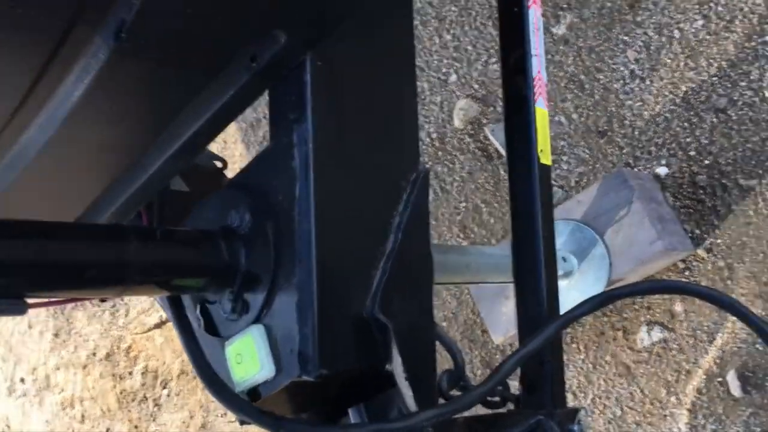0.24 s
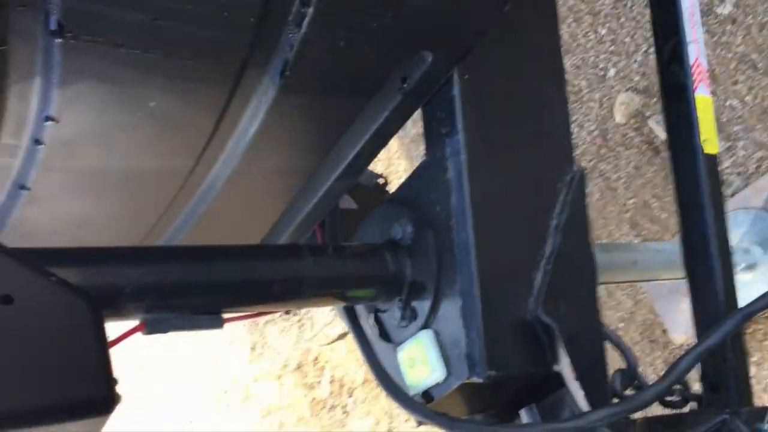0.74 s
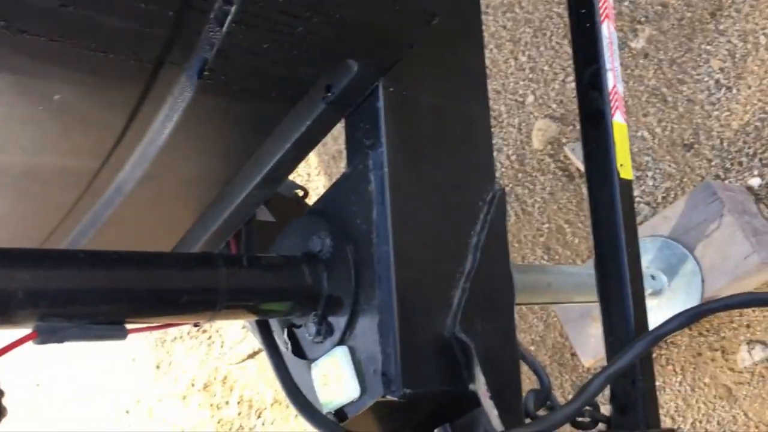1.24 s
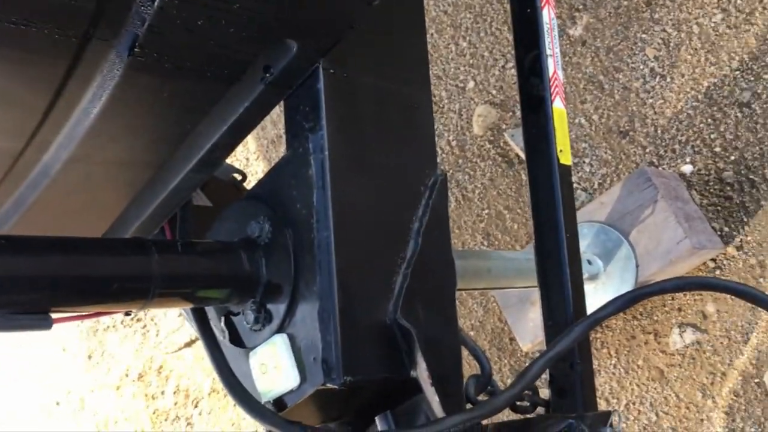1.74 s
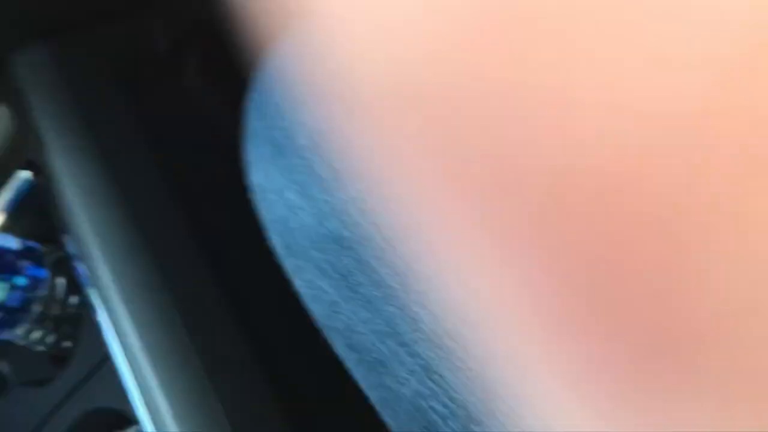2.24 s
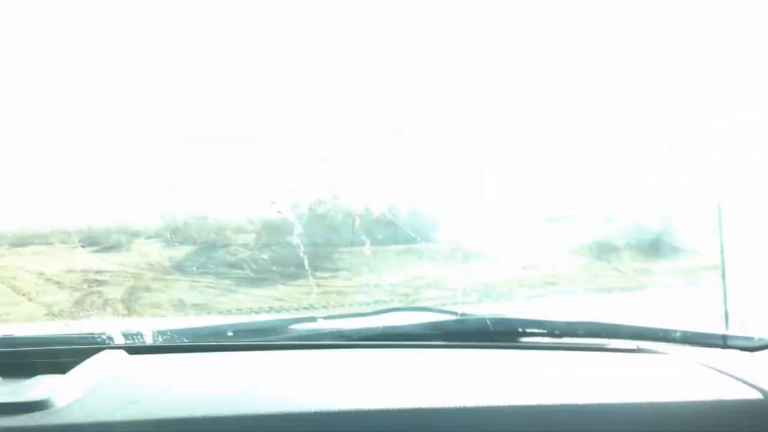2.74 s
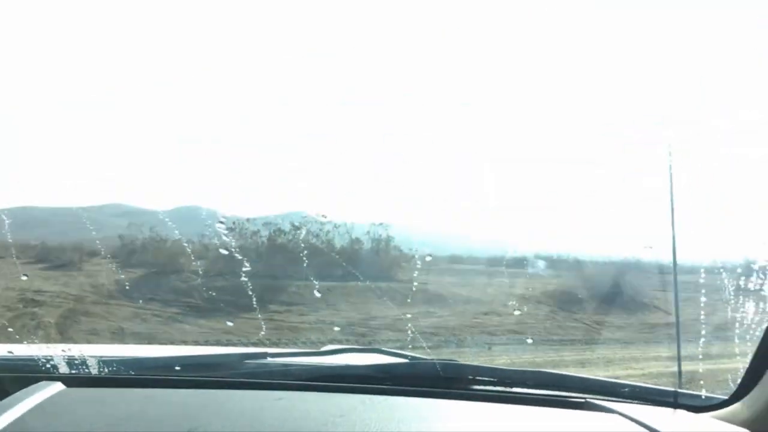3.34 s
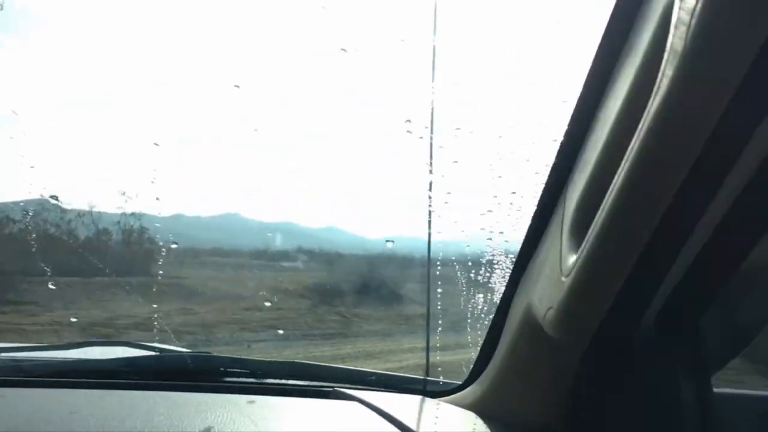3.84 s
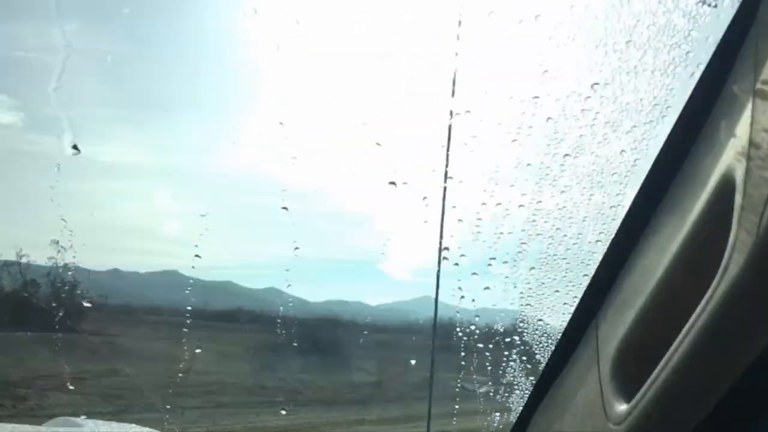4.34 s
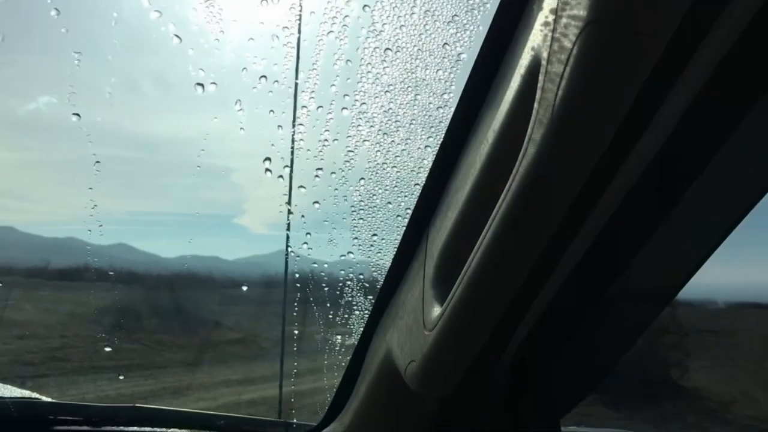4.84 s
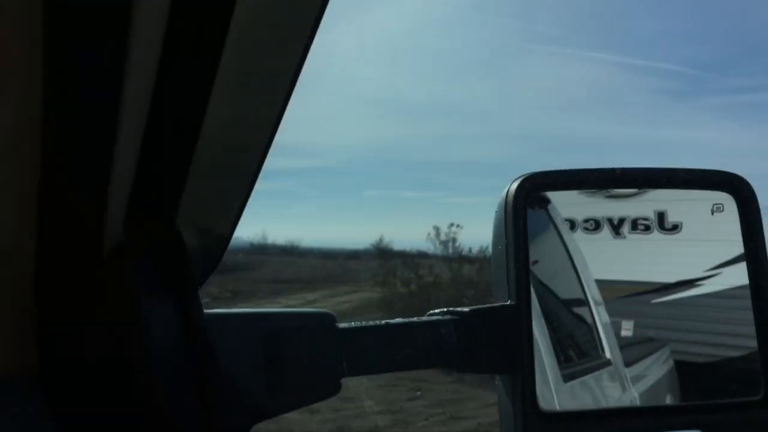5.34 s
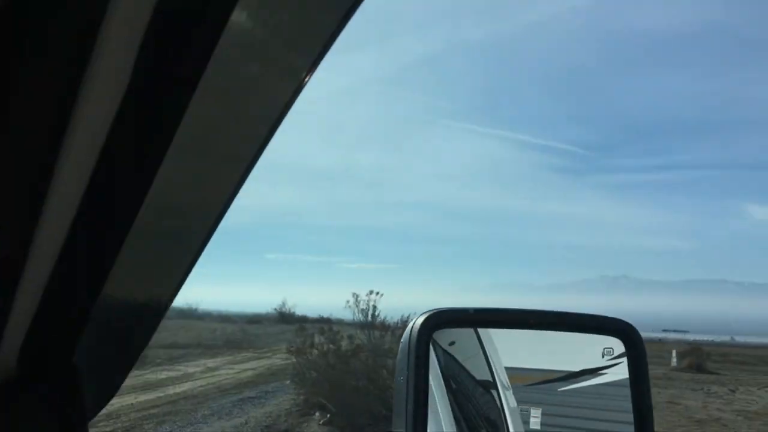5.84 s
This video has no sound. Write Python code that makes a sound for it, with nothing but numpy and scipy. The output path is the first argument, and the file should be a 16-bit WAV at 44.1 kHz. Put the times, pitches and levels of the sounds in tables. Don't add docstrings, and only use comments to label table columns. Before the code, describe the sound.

A loud, nasal motor whine with a rough metallic flutter fills the first two seconds, close to a phone microphone in open air. It cuts off abruptly. Then a padded, small vehicle cabin: deep engine drone, lumpy wheel rumble, cloth and hand handling, sparse sharp clicks, soft thuds, creaking seat and rattling trim. Knocks gather towards the end while the treble becomes slightly duller. No speech.

```python
import sys
import numpy as np
from scipy import signal
from scipy.fft import rfft, irfft, next_fast_len
from scipy.io import wavfile

SR = 44100
rng = np.random.default_rng(int(sys.argv[2]) if len(sys.argv) > 2 else 0)


def volts(x):
    e = np.asarray(x, float) / 20
    return 10 ** e


def output_pcm(signal):
    pcm = np.clip(np.atleast_2d(signal).T, -1, 1) * 32767
    wavfile.write(sys.argv[1], SR, np.round(pcm).astype(np.int16))


N = 269010

JACK_ENDS_S, CABIN_STARTS_S = 2.1333, 2.1811

# (time [s], shaft turns [Hz])
SHAFT_SPEED = [
    (0.0, 66.85),
    (0.37, 67.71),
    (1.27, 68.54),
    (1.35, 69.02),
    (2.12, 68.63),
]
# (multiple of the shaft [-], level [dB])
SHAFT_ORDERS = [(1, -22), (2, -20), (3, -36), (4, -20), (5, -19.5), (6, -15.5), (7, -16.5), (8, -10),
                (9, -11), (10, -1), (11, -11), (12, -16), (13, -17.5), (14, -11), (15, -5.5), (16, -7.5),
                (17, -8), (18, -0.5), (19, -27), (20, 4), (21, 2), (22, -7), (23, -9.5), (24, -9),
                (25, -12), (26, -17.5), (27, -8), (28, -13.5), (29, -28), (30, -13)]
# (time [s], seating [dB])
SEATING = [
    (0, -6.5),
    (.18, -3),
    (.26, 3.5),
    (.6, 1),
    (.92, 0),
    (1.14, -11),
    (1.28, -5),
    (1.38, -3),
    (2.02, 1.5),
    (2.13, -9),
]
# (time [s], peak [dB])
SLAPS = [(0.0463, -18), (0.0917, -19), (0.1171, -26.5), (0.1431, -11), (0.1775, -14), (0.194, -11),
         (0.2433, -16), (0.2683, -15), (0.2867, -10), (0.3282, -21), (0.383, -18), (0.4025, -15),
         (0.4299, -8), (0.4564, -14), (0.5132, -10), (0.5477, -13), (0.5661, -19), (0.6055, -16),
         (0.6559, -19), (0.6779, -24), (0.7078, -24), (0.7357, -29), (0.7672, -26), (0.7991, -25),
         (0.8255, -23), (0.846, -10), (0.8844, -25), (0.9148, -28), (0.9464, -18), (0.9906, -15),
         (1.0196, -23), (1.0939, -17), (1.1049, -16), (1.1338, -13), (1.1618, -16), (1.2334, -12),
         (1.2984, -15), (1.3229, -11), (1.3698, -3), (1.4137, -20), (1.4431, -22), (1.4676, -17),
         (1.5012, -5.5), (1.5878, -19), (1.6516, -19), (1.6886, -8), (1.718, -22), (1.7639, -21),
         (1.7876, -20), (1.8297, -7), (1.8642, -24), (1.8901, -18), (1.9325, -17), (1.9644, -14),
         (2.0203, -21), (2.0466, -16), (2.0662, -12), (2.1051, -14)]
# (time [s], peak [dB])
GROANS = [(0.0453, -25), (0.1206, -12), (0.2593, -18), (0.3172, -29), (0.4, -14), (0.4903, -34),
          (0.5645, -29), (0.7098, -3), (0.8565, -14), (0.9582, -26), (1.0221, -49), (1.0655, -30),
          (1.1293, -18), (1.1932, -17), (1.2471, -29), (1.3673, -15), (1.4102, -1), (1.5442, -20),
          (1.686, -22), (1.8307, -12), (1.9215, -11), (1.9637, -15), (2.0642, -16), (2.1066, -36)]
# (time [s], peak above 2 kHz [dB])
RIB_RATTLES = [(0.0373, -12), (0.0827, -23), (0.1256, -18), (0.1725, -9), (0.2518, -22), (0.3222, -33),
               (0.4025, -20), (0.4539, -14), (0.5422, -21), (0.608, -22), (0.6454, -27), (0.6923, -38),
               (0.7547, -18), (0.8066, -33), (0.8954, -13), (0.9712, -33), (1.0201, -20), (1.0924, -25),
               (1.1278, -21), (1.1573, -13), (1.2336, -22), (1.3024, -23), (1.3703, -11), (1.4431, -13),
               (1.513, -25), (1.5838, -25), (1.6661, -14), (1.727, -17.5), (1.7848, -18.5), (1.8721, -20),
               (1.9355, -23), (1.9779, -23), (2.0163, -18.5), (2.0892, -24.5)]
# (pitch [Hz], width [Hz], level [dB])
CASE_RINGS = [(1384, 71, 3.5), (1982, 21, -2.5), (2190, 92, -3), (2590, 94, -9.5), (2869, 19, -4.5),
              (3443, 76, -13.5), (3780, 420, -23.5)]
# (frequency [Hz], density [dB per Hz])
CASE_NOISE = [(18, -27), (30, -12), (157, -22), (215, -8.5), (371, -26), (614, -16), (682, -11.5),
              (824, -22.5), (1020, -0.5), (1390, -7.5), (1750, -59), (2210, -11.5), (4500, -31),
              (5850, -69), (9900, -120)]
# (frequency [Hz], density [dB per Hz])
BRUSH_GRIND = [(2060, -1), (3500, 0), (3680, -3.5), (4840, -9.5), (5390, -5), (6660, -8.5), (7500, -15.5),
               (8550, -8.5), (9450, -12.5), (11500, -8), (12400, -14.5), (13600, -13), (15600, -28)]
GEAR_RATIO = 9.6
WHINE_DB, GRIND_DB = -21, -35
RING_PER_SEATING, RING_FADE_DB_PER_S = -0.19, 2.5
MESH_FLUTTER = 0.26
SURGE_RISE_S, SURGE_REST_DB, RIB_REST_DB = 0.0074, -17.5, -19.5
SLAP_SHARE, GROAN_SHARE, RIB_SHARE = 0.73, 0.65, 0.41
MAIN_RING_STEADY, RIB_RING_STEADY = 0.84, 0.47

# (time [s], firing rate [Hz], boom [dB])
ENGINE = [(2.18, 44.1, -48), (2.26, 45.36, -26.5), (2.75, 44.9, -35.5), (2.87, 45.65, -27.5),
          (3.17, 47.6, -37), (3.29, 50.14, -29.5), (3.76, 51.2, -31), (3.94, 52.35, -25),
          (4.08, 51.97, -29.5), (4.37, 52.1, -28.5), (4.62, 51.5, -24.5), (4.74, 46.43, -30.5),
          (5.0, 45.24, -36), (5.31, 44.73, -32), (5.52, 44.74, -30), (5.68, 42.4, -41), (6.1, 41.3, -30.5)]
# (multiple of the firing rate [-], level [dB])
FIRING_ORDERS = [(2, -7.5), (3, -11), (4, -19.5), (5, -20), (6, -23.5)]
# (time [s], level change [dB])
RUTS = [
    (4.47, -32),
    (4.57, -13),
    (4.68, -10),
    (4.889, -4),
    (5.029, -11),
    (5.46, -27),
]
RUT_S = 0.029

# (time [s], crack [dB], body [dB], main ring [Hz], upper ring [Hz])
KNOCKS = [(2.5303, -33, -43, 754, 2050), (3.5862, -43, -49, 559, 1400), (3.892, -71, -41, 611, 1417),
          (4.1805, -46, -16, 1096, 1920), (4.191, -33, -39, 960, 1490), (4.2, -29, -37, 563.5, 1580),
          (4.586, -51, -47, 678, 1395), (4.611, -44, -58, 1021, 1410), (4.649, -43, -45, 550, 1350),
          (4.774, -23.5, -27, 810, 1910), (4.783, -26, -39, 596, 1500), (5.242, -44, -26.5, 750, 1249),
          (5.3086, -47, -25, 810, 1920), (5.459, -67, -33, 863, 2485), (5.6862, -19.5, -20, 605, 1460),
          (5.719, -29, -29.5, 600, 1500), (5.848, -38.5, -40.5, 1080, 3140),
          (5.889, -45, -42.5, 1000, 2250), (6.0787, -18.5, -19, 876, 1970)]
# (time [s], crack [dB], upper ring [Hz])
RATTLES = [(2.541, -34.5, 2650), (2.546, -46, 1900), (2.564, -44, 1680), (2.58, -50, 1370),
           (4.358, -40, 1390), (4.384, -39.5, 1431), (5.11, -60, 2070), (5.2349, -31, 1306),
           (5.303, -37, 3050), (5.317, -28, 1540), (6.084, -20, 1210), (5.389, -37.5, 1560),
           (5.437, -42, 1650), (5.524, -43, 1490), (5.6155, -35, 2790), (5.802, -49, 2110),
           (5.862, -58, 1356), (5.989, -44.5, 1496)]
# (pitch [Hz], level [dB], time to fall 60 dB [s])
TRIM_RINGS = [(300, -32, 0.069), (466, -29, 0.047), (616, 31.5, 0.075), (840, 33, 0.066), (1070, -8, 0.15),
              (1500, -12, 0.075), (1605, -31, 0.06), (1948, -40, 0.06), (2430, -56, 0.059)]
# (frequency [Hz], density [dB per Hz])
CRACK = [(1290, 9), (2200, 5.5), (2770, 2), (4670, -34), (5030, -48), (6590, -35), (15600, -47)]
# (time [s], level [dB], pitch [Hz])
THUDS = [
    (3.79, -39, 334),
    (4.077, -32.5, 261),
    (4.183, -37, 227),
    (4.383, -32.5, 321),
    (4.773, -51, 345.4),
    (5.692, -25.5, 259),
    (5.722, -31.5, 282),
    (6.08, -36, 266),
]
# (time [s], level [dB], treble above body [dB], body pitch [Hz])
TICKS = [(2.182, -34, 4, 1710), (2.2386, -43, 9, 2580), (2.2825, -34, -10, 3100), (2.318, -45, -8, 1630),
         (2.389, -27, -5, 2500), (2.4905, -21.5, -4, 2840), (2.7497, -41, -20, 2180),
         (3.0579, -56, -23, 1650), (3.2615, -18, -5, 2550), (3.3933, -20.5, -12, 2452),
         (3.515, -44, -18, 1700), (3.729, -55, -18, 1740), (4.0129, -34, -9, 1870),
         (4.7772, -12, -36, 1400), (4.18, -21, -18, 2000), (5.434, -31, -23, 1750), (5.465, -36, -20, 2780),
         (5.617, -42, -18, 2900), (5.85, -43, -18, 3200), (5.891, -32, -10, 2400), (6.085, -17, -22, 1304),
         (5.7227, -22, -15, 1600)]
# (pitch [Hz], width [Hz], level [dB])
TICK_RINGS = [(4300, 1600, 8.5), (6320, 1100, 9), (8900, 2000, 13.5), (11330, 2100, -3)]
RATTLE_BODY_DB, RATTLE_RING_HZ, RATTLE_CRACK = -25, 720, 0.55
KNOCK_SCRAPE_S, RATTLE_SCRAPE_S = 0.003, 0.0063

# (time [s], rumble [dB])
ROAD = [(2.18, -39), (2.3, -43), (2.8, -38), (3.02, -42.5), (3.12, -47.5), (3.18, -41.5), (3.46, -41),
        (3.55, -37), (3.95, -40.5), (4.1, -35.5), (4.17, -43), (4.58, -36), (4.85, -39.5), (5.18, -33.5),
        (5.3, -35), (5.87, -38.5), (5.93, -42), (6.1, -38)]
# (frequency [Hz], density [dB per Hz])
RUMBLE = [(24, -40), (40, -7.5), (69, -3), (97, -8.5), (155, -10), (216, -18.5), (325, -21), (460, -31.5),
          (700, -28.5), (910, -55), (1540, -120)]
# (frequency [Hz], density [dB per Hz])
BUZZ = [(210, -1), (350, -6), (600, -11.5), (801, -10), (849, -11), (1000, -10.5), (3500, -26.5),
        (4550, -50), (7700, -120)]
# (middle [s], strength over rest [dB], width [s])
HAND = [(2.2, 13, 0.048), (2.31, 8.5, 0.055), (2.44, 8.5, 0.071), (2.53, 12, 0.042), (2.585, 12, 0.03),
        (2.96, -2, 0.019), (3.18, 5.5, 0.046), (3.4, -2, 0.22), (3.59, 6.5, 0.036), (3.71, 5, 0.045),
        (3.91, 7, 0.048), (4.19, 11.5, 0.054), (4.3, 9, 0.019), (4.38, 8, 0.043), (4.6, 7.5, 0.061),
        (4.83, 5.5, 0.12), (5.1, 6.5, 0.064), (5.23, 9.5, 0.081), (5.36, 8.5, 0.12), (5.46, 3.5, 0.049),
        (5.55, 1, 0.035), (5.66, 13.5, 0.16), (5.85, 5, 0.071), (5.94, 5, 0.069), (6.09, 12, 0.11)]
# (frequency [Hz], density [dB per Hz])
RUSTLE = [(1180, -4.5), (2000, -8), (2530, 3), (2810, -1), (3850, -1.5), (6500, -5), (8450, -42),
          (14300, -120)]
# (frequency [Hz], density [dB per Hz])
FIZZ = [(3820, -40), (6500, -2), (8870, 0.5), (10600, -4.5), (12300, -1.5), (15600, -10.5)]
# (middle [s], strength over rest [dB], width [s])
CREAKS = [(2.33, 7, 0.082), (2.95, 9, 0.05), (3.17, 4, .05), (3.6, 7, .07), (3.9, 9.5, 0.081),
          (4.07, 15, 0.045), (4.37, 15, 0.027), (4.64, 7, 0.032), (5.16, 9, 0.035), (5.27, 19.5, 0.035),
          (5.38, 15, 0.075), (5.5, 15, 0.035), (5.53, 10, 0.014), (5.6, 17, 0.042), (5.8, 8, 0.032),
          (6.0, 2, .03)]
BUZZ_DB, BUZZ_PER_RUMBLE, BUZZ_PER_HAND = -48, 0.51, 0.079
RUSTLE_REST_DB, FIZZ_REST_DB, FIZZ_PER_HAND, FIZZ_FLOOR_DB = -68.5, -81, 1.28, -78
CREAK_HZ, CREAK_WIDTH_HZ, CREAK_REST_DB = 1480, 430, -68

# (pitch [Hz], width [Hz], level [dB])
FRAME_HUM = [(45.5, 5, -46), (209.2, 9.6, -41), (316, 26, -41.5)]
HUM_STEADY = 1.9
# (time [s], swell or lull [dB], width [s])
GUSTS = [
    (0.13, -6, 0.078),
    (1.44, 7, .12),
    (2.6, 6, 0.068),
    (0.86, -3, .03),
    (1.1, -8, 0.0298),
]
# (time [s], level [dB], pitch [Hz])
PUFFS = [
    (.655, -32, 72),
    (.64, -38, 110),
    (1.545, -33, 85),
]
BREEZE_DB, PUFF_S = -43.5, 0.042

CABIN_T60_S, CABIN_DB = 0.07, -11
SHADE_S, SHADE_LASTS_S, SHADOW_DB, SHADOW_HZ = 5.11, 0.11, -6.5, 5670
# (frequency [Hz], side minus middle [dB])
JACK_SIDE = [(60, -34), (180, -38), (550, -42.5), (1650, -38.5), (4970, -12.5), (15000, -22.5)]
# (frequency [Hz], side minus middle [dB])
CABIN_SIDE = [(60, -89), (180, -48), (550, -31.5), (1650, -28.5), (4970, -30), (15000, -33)]
# (frequency [Hz], threshold [dB])
KEPT_ABOVE = [(2500, -114), (4000, -99), (7000, -96), (11000, -94.5), (15000, -95)]
# (middle [s], change [dB], width [s])
THRESHOLD_SHIFTS = [(2.3, 4, .05), (2.65, 8, .015), (2.81, 6, .04), (3.05, -3, .09), (3.325, 14, .04),
                    (3.43, -7, .04), (3.54, 14, .045), (3.69, 8, .015), (3.77, 7, .015), (3.8, -6, .015),
                    (3.845, 12, .02), (3.93, -7, .03), (3.975, 10, .012), (4.26, -6, .04), (4.37, 14, .05),
                    (4.68, 10, .045), (4.84, -5, .04), (4.96, 6, .025), (5.4, 6, .03), (5.62, -6, .03),
                    (6.03, 7, .025)]
EDGE_HZ = 15750


def evened(x):
    return x / np.sqrt(np.mean(x ** 2) + 1e-20)


def peaked(x):
    return x / abs(x).max()


def read(points, hz):
    f, value = np.transpose(points)
    return np.interp(np.log(hz + 1), np.log(f + 1), value)


def curves(rows, t):
    s, *columns = np.transpose(rows)
    return [np.interp(t, s, c) for c in columns]


def swells(rows, t):
    return sum(db * np.exp(-((t - s) / width) ** 2) for s, db, width in rows)


def add(mix, s, sound):
    part = mix[round(s * SR):][:len(sound)]
    part += sound[:len(part)]


def colour(x, points):
    size = next_fast_len(len(x))
    gain = volts(read(points, np.fft.rfftfreq(size, 1 / SR)))
    return irfft(rfft(x, size) * gain, size)[:len(x)]


def noise(t, points):
    return evened(colour(rng.standard_normal(len(t)), points))


def resonate(x, hz, width):
    r = np.exp(-np.pi * width / SR)
    return signal.lfilter([1 - r, 0, r - 1], [1, -2 * r * np.cos(2 * np.pi * hz / SR), r * r], x)


def wander(t, hz):
    steps = rng.standard_normal(int((t[-1] - t[0]) * 400) + 800)
    smooth = signal.filtfilt(*signal.butter(2, min(hz, 150), fs=400), steps)[400:-200]
    return np.interp((t - t[0]) * 400, np.arange(len(smooth)), evened(smooth))


def jack(t):
    shaft_hz = curves(SHAFT_SPEED, t)[0]
    turns = np.cumsum(shaft_hz * (1 + 0.002185 * wander(t, 8.95))) / SR
    wheel = 2 * np.pi * turns / GEAR_RATIO
    bind = np.cos(2 * wheel + 1.8) + 0.7 * np.cos(wheel - 1.4)
    seating_db = curves(SEATING, t)[0]
    ring_db = RING_PER_SEATING * seating_db - RING_FADE_DB_PER_S * (t - t.mean())
    ring_db += SLAP_SHARE * surges(SLAPS, t)
    rib_db = RIB_SHARE * surges(RIB_RATTLES, t, RIB_REST_DB)
    groan_db = GROAN_SHARE * surges(GROANS, t)

    orders = shaft_tones(t, turns, wheel, bind, seating_db, ring_db, rib_db, groan_db)
    load = 1 + 0.38 * np.cos(2 * np.pi * turns) + 0.25 * np.cos(8 * np.pi * turns)
    teeth = load * volts(2.4 * bind) * rng.standard_normal(len(t))
    case = gear_case(teeth, wheel, ring_db, rib_db)
    dull = colour(teeth * volts(0.21 * groan_db), CASE_NOISE)
    whine = volts(-1.5) * evened(orders) + volts(-9) * evened(case) + volts(-6) * evened(dull)
    brush_db = 0.17 * rib_db + bind + 0.99 * np.cos(4 * np.pi * turns) + 1.45 * wander(t, 52)
    return volts(WHINE_DB) * whine + volts(GRIND_DB + brush_db) * noise(t, BRUSH_GRIND)


def shaft_tones(t, turns, wheel, bind, seating_db, ring_db, rib_db, groan_db):
    lash = 0.029 * wander(t, 22) + 0.036 * np.sin(2 * wheel)
    orders = np.zeros(len(t))
    for k, db in SHAFT_ORDERS:
        slip = 0.022 * k * wander(t, 25) + k * lash
        depth_db = (2.8 + 0.038 * k) * (MESH_FLUTTER if 13 < k < 22 else 1)
        flutter_db = depth_db * wander(t, 21.5) + 0.07 * bind * k
        if k == 10:
            flutter_db += seating_db
        if 13 < k < 19:
            flutter_db += groan_db
        if 18 < k < 23:
            flutter_db += ring_db
        if k > 22:
            flutter_db += rib_db
        phase = 2 * np.pi * (k * turns + 0.56 * rng.random()) + slip
        orders += volts(db + flutter_db) * np.cos(phase)
    return orders


def gear_case(teeth, wheel, ring_db, rib_db):
    case = np.zeros(len(teeth))
    for hz, width, db in CASE_RINGS:
        change_db = ring_db if hz < 1500 else rib_db + 1.4 * np.cos(wheel / 2 + hz)
        case += volts(db + change_db) * case_ring(teeth, hz, width)
    return case


def case_ring(teeth, hz, width):
    ring = resonate(resonate(teeth, hz, width), hz, 6 * width)
    size = abs(signal.hilbert(ring, next_fast_len(len(ring)))[:len(ring)])
    steady = MAIN_RING_STEADY if hz < 1500 else RIB_RING_STEADY
    return ring * (size.mean() / (size + 0.2 * size.mean())) ** steady


def surges(rows, t, rest_db=SURGE_REST_DB):
    level = volts(rest_db)
    for s, db in rows:
        age = np.maximum(t - s + SURGE_RISE_S / 2, 0) / SURGE_RISE_S
        level = level + volts(db) * age * np.exp(1 - age)
    return 20 * np.log10(evened(level))


def engine(t):
    firing_hz, boom_db = curves(ENGINE, t)
    phase = 2 * np.pi * np.cumsum(firing_hz * (1 + 0.0088 * wander(t, 10.5))) / SR
    rut_db = swells([(s, db, RUT_S) for s, db in RUTS], t)
    boom = volts(boom_db + rut_db) * np.sin(phase)
    for k, db in FIRING_ORDERS:
        level = volts(db - 35.5 + 4.3 * wander(t, 8))
        boom += level * np.sin(k * phase + 2 * np.pi * rng.random())
    return np.sqrt(2) * boom


def cabin_hits():
    knocks, ticks = np.zeros(N), np.zeros(N)
    for s, *row in KNOCKS:
        add(knocks, s, knock(*row, KNOCK_SCRAPE_S))
    for s, db, upper_hz in RATTLES:
        body_db = db + RATTLE_BODY_DB
        add(knocks, s, knock(db, body_db, RATTLE_RING_HZ, upper_hz, RATTLE_SCRAPE_S, RATTLE_CRACK))
    for s, *row in THUDS:
        add(knocks, s, thud(*row))
    for s, *row in TICKS:
        add(ticks, s, tick(*row))
    return cabin_echo(knocks + 0.21 * ticks) + 0.22 * ticks


def knock(crack_db, body_db, ring_hz, upper_hz, length, crack_share=1):
    t = np.arange(int(0.12 * SR)) / SR
    chance = rng.standard_normal((2, len(t)))
    scrape = chance[0] * (t / length) * np.exp(-t / length)
    panel = sum(volts(db) * peaked(resonate(scrape, hz, 2.2 / t60)) for hz, db, t60 in TRIM_RINGS)
    spot = peaked(resonate(scrape, ring_hz, 190))
    body = volts(body_db + 3.5) * peaked(spot + 0.35 * peaked(panel))
    upper = peaked(resonate(chance[0] * np.exp(-t / length), upper_hz, 260))
    crack = colour(chance[1], CRACK) * np.exp(-t / (2.8 * length)) * np.minimum(t / 0.0055, 1)
    return body + volts(crack_db - 0.5) * (crack_share * peaked(crack) + 0.93 * upper)


def thud(db, hz):
    t = np.arange(int(0.1 * SR)) / SR
    swell = t / 0.01 * np.exp(1 - t / 0.0074)
    overtone = 0.5 * np.sin(2 * np.pi * 1.447 * hz * t + 1)
    return volts(db) * swell * (np.sin(2 * np.pi * hz * t) + overtone)


def tick(db, treble_db, body_hz):
    t = np.arange(int(0.02 * SR)) / SR
    snap = (t == 0) + 0.17 * rng.standard_normal(len(t)) * np.exp(-t / 0.00074)
    body = resonate(resonate(snap, body_hz, 630), body_hz, 2100)
    body += 2.1 * resonate(resonate(snap, 0.96 * body_hz, 700), body_hz, 2500)
    edge = sum(volts(g) * peaked(resonate(resonate(snap, hz, w), hz, 2 * w)) for hz, w, g in TICK_RINGS)
    low = 0.28 * peaked(resonate(snap, 800, 450))
    return volts(db) * (peaked(body) + volts(treble_db) * peaked(edge) + low)


def road(t, hand_db, grain_db):
    rumble_db = curves(ROAD, t)[0]
    buzz_db = BUZZ_DB + BUZZ_PER_RUMBLE * (rumble_db - rumble_db.mean()) + BUZZ_PER_HAND * hand_db
    rumble = volts(rumble_db + 3 + 2 * wander(t, 18)) * noise(t, RUMBLE)
    return rumble + volts(buzz_db + grain_db) * noise(t, BUZZ)


def cloth_and_hand(t, hand_db, grain_db):
    rustle_db = RUSTLE_REST_DB + hand_db + 1.34 * grain_db + 0.43 * wander(t, 32)
    fizz_db = np.maximum(FIZZ_REST_DB + FIZZ_PER_HAND * hand_db, FIZZ_FLOOR_DB)
    return volts(rustle_db) * noise(t, RUSTLE) + volts(fizz_db + 7 + 1.1 * grain_db) * noise(t, FIZZ)


def seat_creak(t, grain_db):
    rub = resonate(rng.standard_normal(len(t)), CREAK_HZ, CREAK_WIDTH_HZ)
    rub = resonate(rub, CREAK_HZ, 2 * CREAK_WIDTH_HZ)
    return volts(CREAK_REST_DB + swells(CREAKS, t) + 1.8 * grain_db) * evened(rub)


def frame_hum(t):
    hum = np.zeros(len(t))
    for hz, width, db in FRAME_HUM:
        ring = resonate(resonate(rng.standard_normal(len(t)), hz, width), hz, width)
        hum += volts(db) * evened(evened(ring) + HUM_STEADY * np.sin(2 * np.pi * hz * t))
    return hum


def breeze(t):
    air = noise(t, [(30, -73), (42, -4.5), (110, -17.5), (200, -56), (600, -71)])
    air = volts(BREEZE_DB + swells(GUSTS, t)) * air
    for s, db, hz in PUFFS:
        air += volts(db) * np.exp(-((t - s) / PUFF_S) ** 2) * np.sin(2 * np.pi * hz * (t - s))
    return air


def cabin_echo(x):
    t = np.arange(int(0.2 * SR)) / SR
    tail = rng.standard_normal(len(t)) * volts(-60 * t / CABIN_T60_S) * (t > 0.002)
    return x + volts(CABIN_DB) * signal.fftconvolve(x, tail / np.linalg.norm(tail))[:len(x)]


def shade(x, t):
    treble = signal.filtfilt(*signal.butter(2, SHADOW_HZ, "high", fs=SR), x)
    sunk = np.clip((t - SHADE_S) / SHADE_LASTS_S, 0, 1)
    return x - (1 - volts(SHADOW_DB * sunk)) * treble


def widen(mid, side_points):
    side = colour(mid * wander(np.arange(len(mid)) / SR, 40), side_points)
    return np.array([mid + side, mid - side])


def scene():
    t = np.arange(N) / SR
    first, second = t < JACK_ENDS_S, t >= CABIN_STARTS_S
    out = np.zeros((2, N))
    outdoors = t[first]
    out[:, first] = widen(jack(outdoors) + frame_hum(outdoors) + breeze(outdoors), JACK_SIDE)

    inside = t[second]
    hand_db, grain_db = swells(HAND, inside), 1.28 * wander(inside, 43)
    shaded = cabin_hits()[second] + road(inside, hand_db, grain_db)
    shaded += cloth_and_hand(inside, hand_db, grain_db) + seat_creak(inside, grain_db)
    out[:, second] = widen(engine(inside) + shade(shaded, inside), CABIN_SIDE)
    return out


def drop_weak_bands(x):
    hz, t, z = signal.stft(x, SR, "cosine", nperseg=2048)
    power = (abs(z) ** 2).mean(0)
    band = np.repeat(power[:-1].reshape(64, 16, -1).mean(1), 16, axis=0)
    shift_db = swells(THRESHOLD_SHIFTS, t) + 2.5 * rng.standard_normal(len(t))
    limit = volts(read(KEPT_ABOVE, hz[:-1])[:, None] + shift_db) ** 2
    keep = (band > limit) | (power[:-1] > 2.1 * limit)
    return signal.istft(z * np.vstack([keep, keep[:1]]), SR, "cosine", nperseg=2048)[1][:, :N]


def band_limit(x):
    return signal.sosfilt(signal.butter(12, 15730, fs=SR, output="sos"), x)


def record(dry):
    t = np.arange(N) / SR
    hiss_db = np.interp(t, [2.133, 2.148, 2.158, 2.17, 2.181], [-54, -60, -82, -69, -64],
                        left=-120, right=-120)
    hiss = volts(hiss_db) * noise(t, [(100, -28), (3000, -29), (15000, -35)])
    heard = drop_weak_bands(0.55 * np.tanh(dry / 0.54)) + hiss
    low_pass = signal.firwin(511, EDGE_HZ, window=("kaiser", 9), fs=SR)
    return band_limit(signal.oaconvolve(heard, low_pass[None], "same"))


dry = scene()
out = record(dry)
output_pcm(out)
```